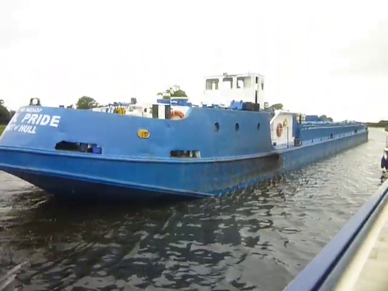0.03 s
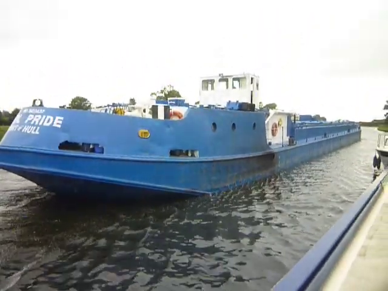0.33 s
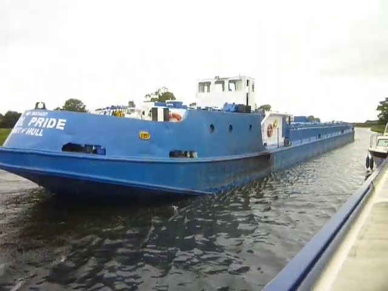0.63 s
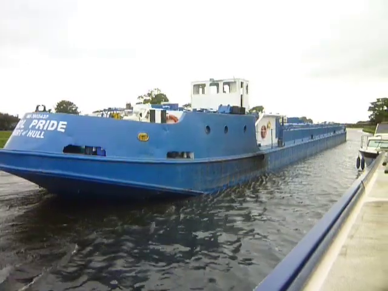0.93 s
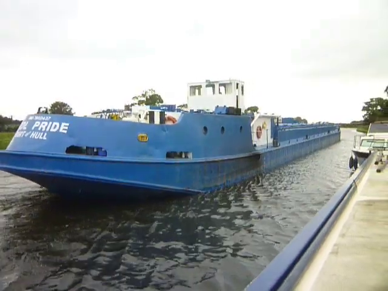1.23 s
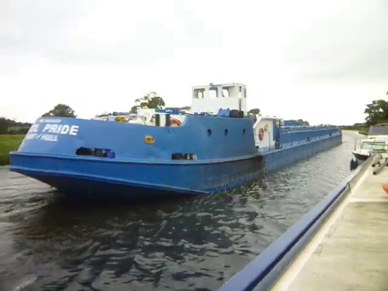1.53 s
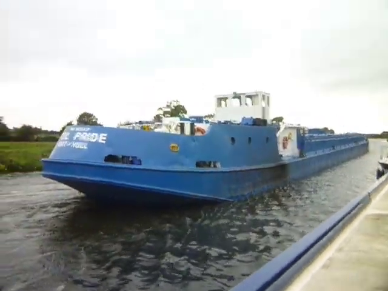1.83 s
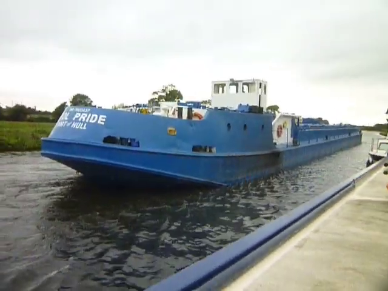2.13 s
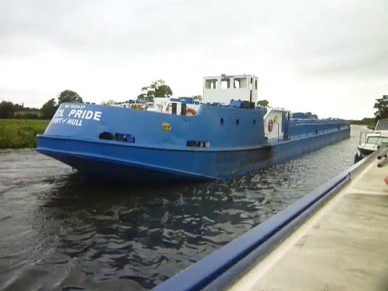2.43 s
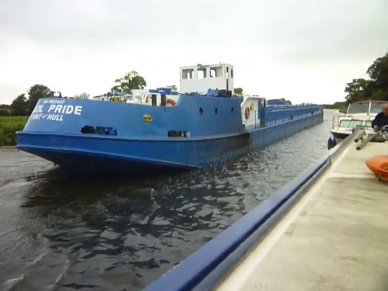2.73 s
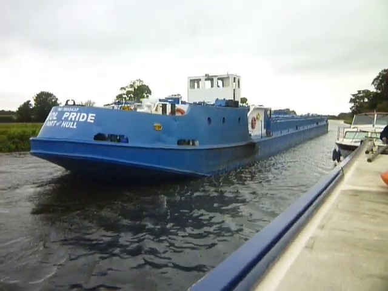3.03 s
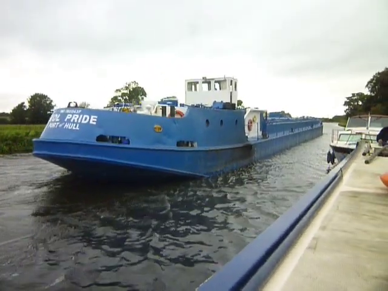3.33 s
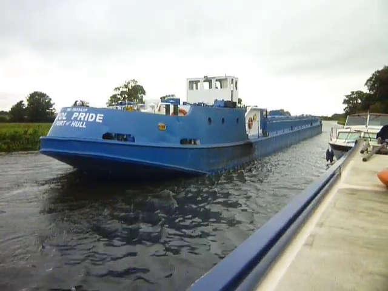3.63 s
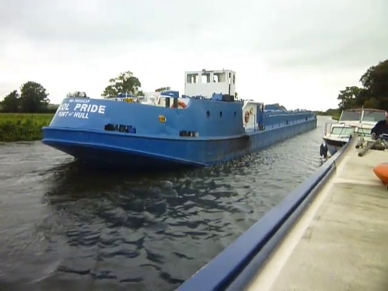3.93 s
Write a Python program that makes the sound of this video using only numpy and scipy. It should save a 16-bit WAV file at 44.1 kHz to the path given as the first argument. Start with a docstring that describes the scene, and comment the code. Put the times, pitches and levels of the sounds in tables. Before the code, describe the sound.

A boat's diesel engine throbs low under wind gusts, with faint knocks and a hollow bump.

```python
"""Diesel boat on a canal

A diesel throbs steadily as a barge draws near: its firings puff the exhaust and shake the hull.
Water washes along the hull, and gusts buffet the microphone with turbulent eddies.
Light knocks and hollow bumps on deck excite the damped modes of a fitting and of the cabin.
The small recorder adds hiss, a thin whine and faint ticks."""
import sys
import numpy as np
from scipy import signal
from scipy.io import wavfile

SR = 44100
rng = np.random.default_rng(int(sys.argv[2]) if len(sys.argv) > 2 else 0)


def file_out(sig):
    """Save sig as 16-bit WAV at sys.argv[1]."""
    # one column per channel
    cols = np.atleast_2d(sig).T
    # limit, then scale
    lim = np.clip(cols, -1, 1)
    pcm = np.round(lim * 32767).astype(np.int16)
    wavfile.write(sys.argv[1], SR, pcm)


N = 176400


def from_db(db):
    """Amplitude ratio of a level in decibels."""
    return 10 ** (np.asarray(db) / 20)


def rms_one(x):
    """Normalisation to unit rms."""
    return x / np.sqrt(np.mean(x ** 2) + 1e-20)


def in_time(rows):
    """Linear interpolation of (t/s, value) rows at every sample."""
    return np.interp(np.arange(N) / SR, *np.transpose(rows))


def drift(corner_hz):
    """Slow random fluctuation of unit rms: two-pole low-pass noise, computed at SR / 40."""
    r = np.exp(-80 * np.pi * corner_hz / SR)
    slow = signal.lfilter([1], [1, -2 * r, r * r], rng.standard_normal(N // 40 + 2002))[2000:]
    return np.interp(np.arange(N) / 40, np.arange(len(slow)), rms_one(slow))


def butterworth(x, hz, kind, order=2):
    """Filter with a maximally flat passband."""
    return signal.sosfilt(signal.butter(order, hz, kind, fs=SR, output="sos"), x + 1e-18)


def ring(force, hz, t60):
    """Damped oscillator: a unit impulse starts a unit sine that falls 60 dB in t60 seconds."""
    r = np.exp(-np.log(1000) / (t60 * SR))
    w = 2 * np.pi * hz / SR
    return signal.lfilter([0, np.sin(w)], [1, -2 * r * np.cos(w), r * r], force + 1e-18)


def banded_noise(spectrum, flicker_db):
    """Noise of unit rms, summed from third-octave bands whose levels fluctuate independently."""
    hz, db = np.transpose(spectrum)
    edges = 22 * 2 ** (np.arange(28) / 3)
    white, out = rng.standard_normal((2, N + SR)), 0
    for k, (low, high) in enumerate(zip(edges, edges[1:])):
        level_db = np.interp(np.log(low * high) / 2, np.log(hz), db)
        if hz[0] / 2 < high and low < hz[-1] * 2:
            band = butterworth(white[k % 2], [low, high], "band", order=3)[SR:]
            out += from_db(level_db + flicker_db * drift(16)) * band
    return rms_one(out)


def swells(rows):
    """Bursts of octave-band noise under Gaussian envelopes; the half length is one sigma."""
    t, out = np.arange(N) / SR, 0
    for centre_s, db, half_s, hz in rows:
        octave = [hz / np.sqrt(2), hz * np.sqrt(2)]
        noise = rms_one(butterworth(rng.standard_normal(N), octave, "band", order=3))
        out += from_db(db) * np.exp(-.5 * ((t - centre_s) / half_s) ** 2) * noise
    return out


def recorder_noise():
    """Self-noise: broadband hiss, a line spectrum of whine, and ticks over a Poisson crackle."""
    # hiss spectrum: f/Hz, relative density/dB
    hiss_spectrum = [(500, 0), (2500, 4), (3500, 2), (5500, 0), (7000, 0), (8000, -8)]
    # whine partials: f/Hz, rms level/dB
    partials = [(2481, -81.5), (2978, -85.5), (3474, -87), (4296, -91), (5428, -77), (6666, -92)]
    # single ticks: t/s, level/dB before the high-pass
    ticks = [(.063, -45), (.322, -48), (.459, -45), (.574, -39), (1.076, -42), (1.425, -33), (1.441, -33),
             (1.959, -36), (2.506, -46), (2.56, -43), (2.692, -33), (2.96, -32), (3.202, -43), (3.834, -39)]
    t, crackles_per_s = np.arange(N) / SR, 33
    whine = sum(from_db(db) * np.sqrt(2) * np.sin(2 * np.pi * hz * t) for hz, db in partials)
    onsets = rng.random(N) < crackles_per_s / SR
    impulses = onsets * from_db(-48.5 + 1.5 * rng.uniform(-1, 1, N))
    for onset_s, db in ticks:
        impulses[int(onset_s * SR)] += from_db(db)
    hiss = from_db(-62.5) * banded_noise(hiss_spectrum, flicker_db=0.5)
    return hiss + whine + butterworth(impulses, 3500, "high")


def water():
    """Water on the hull radiates soft, amplitude-modulated noise; single laps add short bursts."""
    # wash spectrum: f/Hz, relative density/dB
    spectrum = [(200, -16), (600, 2), (850, -3.5), (1200, -6.5), (1600, -18), (2200, -22.5), (3200, -47.5),
                (6000, -46.5)]
    # wash envelope: t/s, level/dB
    envelope = [(0, -44.5), (1, -42.5), (1.4, -45.5), (1.85, -44), (2.1, -45.5), (2.6, -44), (2.9, -49.5),
                (3.25, -46), (3.6, -48), (4, -47)]
    # single laps: t/s, level/dB, half length/s, centre f/Hz
    laps = [(.78, -47, 0.018, 850), (1.465, -49, 0.014, 1074), (1.61, -47.5, .015, 1170),
            (1.99, -45, 0.0086, 840), (2.81, -44.5, 0.017, 830), (3.205, -42, .022, 820)]
    return from_db(in_time(envelope)) * banded_noise(spectrum, flicker_db=1.77) + swells(laps)


def knocks():
    """Impact excitation: a tap and a brief scuff drive a fitting's modes; the scuff also rasps."""
    # knocks on deck: t/s, relative level/dB, scuff centre f/Hz, scuff decay time/s
    impacts = [(.443, -40.5, 1470, .008), (0.731, -44, 2150, .012), (1.041, -51, 2200, .005),
               (1.467, -37, 2250, 0.0083), (1.6, -39, 2450, 0.011), (1.616, -42, 1550, .008),
               (1.933, -28, 1340, .003), (2.1, -41.5, 2100, .012), (2.788, -39.5, 2150, 0.0062),
               (3.19, -46, 2298, .018), (3.268, -44, 1400, .003)]
    # modes of the fitting: f/Hz, relative level/dB, T60/s
    modes = [(716, 0, 0.033), (935, 0.5, 0.039), (1106, -2, 0.03), (1305, -3, 0.033), (1418, -5, 0.025),
             (1910, -18.5, 0.015), (2260, -19.5, .035), (3130, -28, 0.014)]
    tap_force, scuff_force = 0.87, 0.6
    rasp_gain, rasp_octaves = from_db(11.5), 0.39
    out, t = np.zeros(N + SR), np.arange(SR // 4) / SR
    for onset_s, db, scuff_hz, scuff_s in impacts:
        scuff = rng.standard_normal(len(t)) * np.exp(-t / scuff_s)
        scuff /= np.linalg.norm(scuff)
        force = tap_force * signal.unit_impulse(len(t)) + scuff_force * scuff
        ringing = sum((-1) ** k * from_db(mode_db) * ring(force, hz, t60)
                      for k, (hz, mode_db, t60) in enumerate(modes))
        edges = scuff_hz * 2 ** (np.array([-.5, .5]) * rasp_octaves)
        rasp = butterworth(scuff, edges, "band")
        rasp /= np.linalg.norm(rasp)
        start = int(onset_s * SR)
        out[start:start + len(t)] += from_db(db) * (ringing + rasp_gain * rasp)
    return out[:N]


def bumps():
    """Modal response of the cabin as something bumps and settles: soft contact spares high modes."""
    # hollow bumps: t/s, relative level/dB, cutoff f/Hz of the contact force
    impacts = [(2.65, -28, 350), (3.423, -22, 1500), (3.431, -30, 1130), (3.439, -19.5, 689),
               (3.452, -16, 295), (3.496, -19, 262), (3.525, -22.5, 260)]
    # modes of the cabin: f/Hz, relative level/dB, T60/s
    modes = [(194, 1.5, 0.092), (226.3, -0.5, 0.11), (280, 2.5, 0.13), (445.7, -2.5, 0.046),
             (550, -2.5, 0.056), (710, -7.5, .035), (797, 0.5, 0.047), (980, -9, .03)]
    out, impulse = np.zeros(N + SR), signal.unit_impulse(SR // 2)
    for onset_s, db, contact_hz in impacts:
        force = butterworth(impulse, contact_hz, "low")
        start = int(onset_s * SR)
        for k, (hz, mode_db, t60) in enumerate(modes):
            gain = (-1) ** k * from_db(db + mode_db + rng.normal(0, 1))
            out[start:start + len(force)] += gain * ring(force, hz, t60)
    return out[:N]


def wind():
    """Turbulent pressure at the microphone: low buffeting swells with each gust, and eddies thud."""
    # gust envelope: t/s, level/dB
    gusts = [(0, -32.5), (.45, -34), (.62, -32), (.79, -31.5), (.93, -34), (1.09, -27.5), (1.22, -33.5),
             (1.38, -43.5), (2.2, -39.5), (2.35, -31), (2.42, -36), (2.51, -32.5), (2.66, -29.5),
             (2.78, -35.5), (3.05, -35), (3.22, -34.5), (3.6, -45), (4, -42)]
    # buffeting spectrum: f/Hz, relative density/dB
    spectrum = [(25, -28), (60, -10), (120, -7.5), (200, -2), (300, 0.5), (450, -8), (700, -14),
                (1100, -24), (1700, -49), (3500, -64.5)]
    # single eddies: t/s, level/dB, half length/s, centre f/Hz
    eddies = [(1.08, -25, 0.016, 219), (1.151, -26.5, 0.016, 167), (2.351, -32, 0.018, 110),
              (2.499, -24, 0.057, 138.1), (2.67, -27, 0.031, 242), (3.799, -36.5, 0.044, 117)]
    lumps_db = 1.9 * drift(corner_hz=35)
    buffeting = from_db(in_time(gusts) + lumps_db) * banded_noise(spectrum, flicker_db=0.3)
    return buffeting + swells(eddies)


def engine():
    """Periodic excitation: the firings give a harmonic exhaust note and modulate the hull's rumble."""
    # engine speed: t/s, firing rate f/Hz
    speed = [(0, 39.2), (.7, 38.3), (1.1, 42.2), (1.9, 37.7), (2.3, 38.8), (2.6, 39.45), (2.95, 37.3),
             (3.4, 39.3), (4, 38.4)]
    # exhaust partials (unequal cylinders add a half order): multiple of firing rate, rms level/dB
    partials = [(1, -50.5), (2, -37), (3, -32.5), (4, -34), (4.5, -42.5), (5, -43), (6, -47.5)]
    # hull rumble spectrum: f/Hz, relative density/dB
    spectrum = [(25, -30.5), (55, -14), (100, -10), (140, -1), (180, -2.5), (240, -7.5), (420, -19),
                (650, -17.5), (850, -25.5), (1500, -56.5)]
    speed_jitter, waver_db, throb_depth = 0.0017, 1.78, 0.26
    dispersion_rad = 0.7497  # the pipe delays higher harmonics more, rounding each puff
    firing_hz = in_time(speed) * (1 + speed_jitter * drift(corner_hz=9.1))
    phase = 2 * np.pi * np.cumsum(firing_hz) / SR
    exhaust = 0
    for order, db in partials:
        amplitude = np.sqrt(2) * from_db(db + waver_db * drift(corner_hz=5.2))
        exhaust += amplitude * np.cos(order * phase - dispersion_rad * order ** 2)
    throb = rms_one(1 + throb_depth * np.cos(phase))
    rumble = from_db(-35) * throb * banded_noise(spectrum, flicker_db=0.5)
    return exhaust + rumble


def scene():
    """Superposition of all sources at one microphone in the open air."""
    return (engine() + wind() + water() + knocks() + bumps())[None]


def record(dry):
    """Band limiting: the recorder adds its self-noise, cuts the top and rests a little off zero."""
    cutoff_hz, dc_offset = 8100, -0.047
    low_pass = signal.ellip(8, .1, 70, cutoff_hz, fs=SR, output="sos")
    return dc_offset + signal.sosfilt(low_pass, dry + recorder_noise())


dry = scene()
out = record(dry)
file_out(out)
```